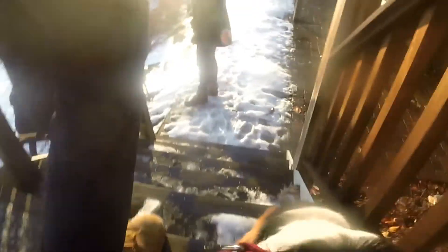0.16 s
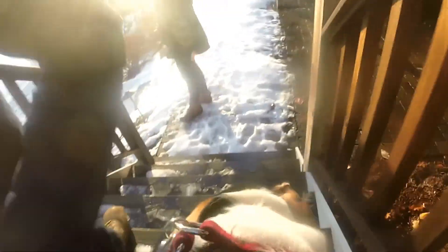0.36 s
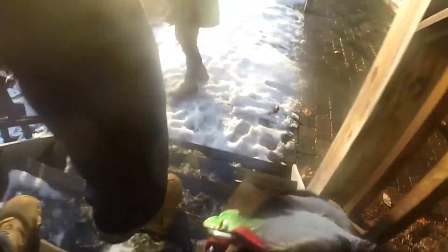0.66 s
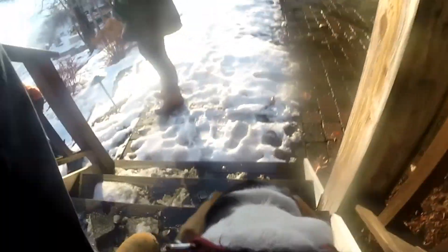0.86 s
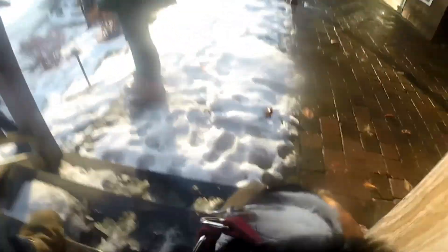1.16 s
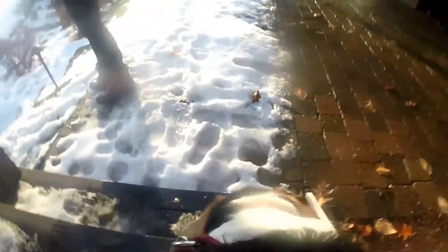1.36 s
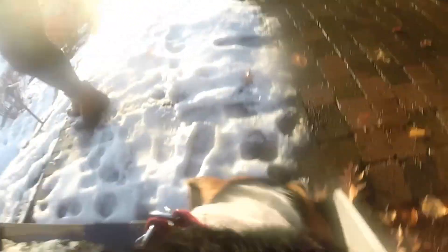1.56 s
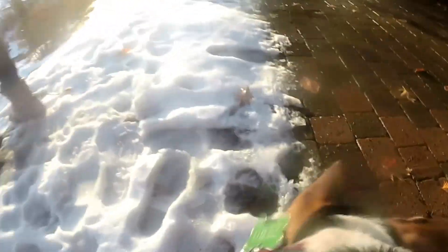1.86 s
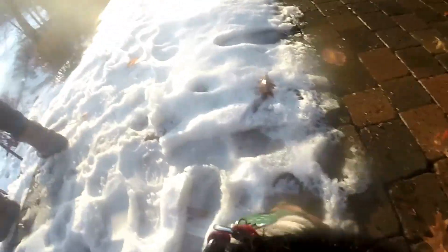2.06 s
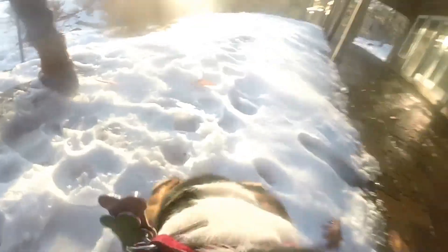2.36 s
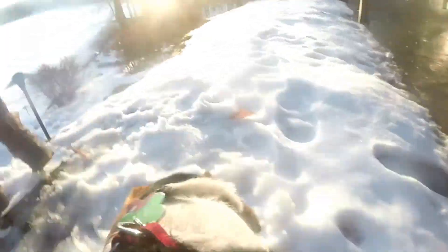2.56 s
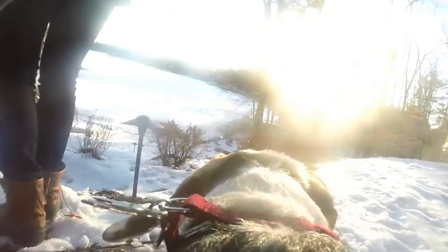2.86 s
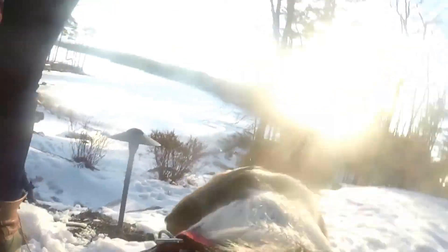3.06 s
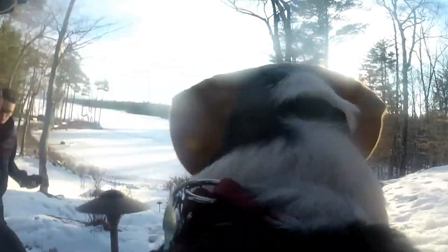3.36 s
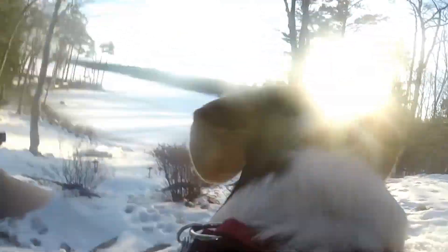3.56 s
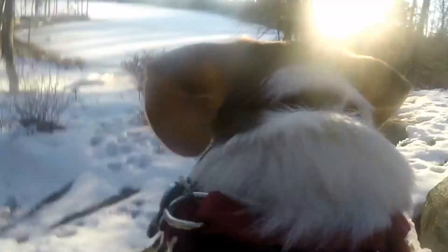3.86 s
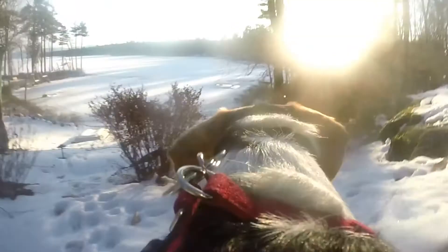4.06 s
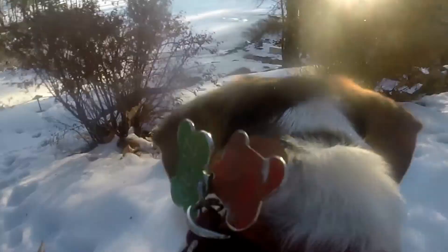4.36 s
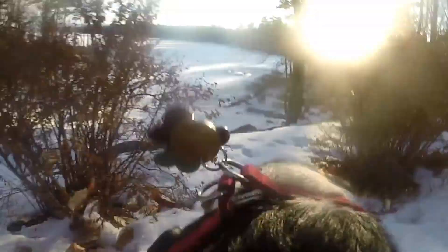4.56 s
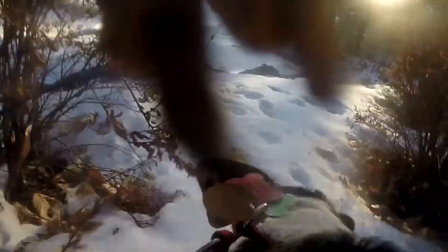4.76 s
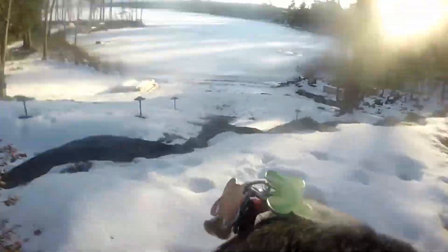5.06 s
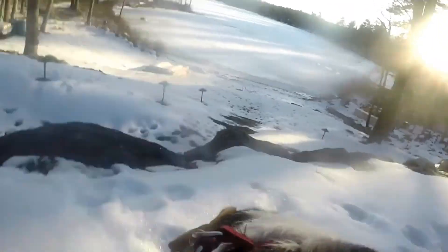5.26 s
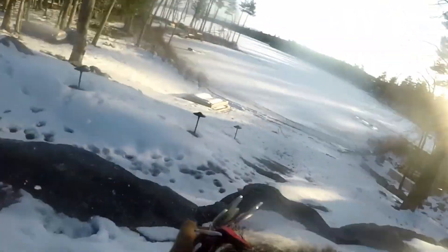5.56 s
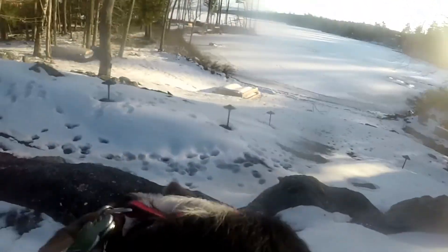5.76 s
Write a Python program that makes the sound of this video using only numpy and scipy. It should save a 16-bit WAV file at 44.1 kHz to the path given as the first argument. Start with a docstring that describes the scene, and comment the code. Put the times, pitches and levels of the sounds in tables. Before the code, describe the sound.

A dog trots out into snow, tags clinking in quick rattles over thumping strides, rubbing straps and two harsh crackling knocks.

```python
"""Collar tags and rings clink on a dog that trots down wooden steps into snow; metal modes ring at each contact.
A camera in a closed plastic case rides on its back: strides jolt the mount with a deep thump, paws knock wood.
Straps rub and tick on the case, which rings near 1.7 kHz; rumble, fur and wind noise swell with the gait.
Twice something scrapes hard over the case in bursts of stick-slip contacts, with sharp catches.
Loud bright sound makes the gain control duck."""
import sys
import numpy as np
from scipy import signal
from scipy.fft import rfft, irfft
from scipy.io import wavfile
from scipy.ndimage import uniform_filter1d

SR = 44100
rng = np.random.default_rng(int(sys.argv[2]) if len(sys.argv) > 2 else 0)


def to_wav(s):
    """Save 16-bit WAV."""
    ch = np.atleast_2d(s).T  # columns
    pcm = np.round(np.clip(ch, -1, 1) * 32767)  # PCM
    wavfile.write(sys.argv[1], SR, pcm.astype(np.int16))


def how_loud(loudness_db):
    """Turn decibels into a plain amplitude multiplier (0 dB gives 1, 20 dB gives 10)."""
    steps = np.asarray(loudness_db, float) / 20
    return 10 ** steps


N = 260190  # length in samples


def in_time(rows):
    """Turn the columns of a table into curves over all samples; the first column is time in seconds."""
    s, *columns = np.transpose(rows)
    return [np.interp(np.arange(N) / SR, s, c) for c in columns]


def rms_one(x):
    """Scale to unit rms."""
    return x / np.sqrt(np.mean(x ** 2) + 1e-20)


def filtered(x, hz, kind):
    """Gentle filter: keep what lies below (low), above (high) or between (band) the given Hz."""
    return signal.sosfilt(signal.butter(2, hz, kind, fs=SR, output="sos"), x)


def coloured(x, spectrum):
    """Shape a steady signal by a spectrum of (Hz, dB) points; rms 1."""
    hz, level_db = np.transpose(spectrum)
    grid = np.arange(N // 2 + 1) * SR / N + 1
    gain = how_loud(np.interp(np.log(grid), np.log(hz), level_db))
    return rms_one(irfft(rfft(x) * gain, N))


def grains(per_s, spread_db):
    """Random contacts of uneven size and sign; rms 1."""
    sizes = how_loud(spread_db * np.minimum(rng.exponential(1, N), 5))
    signs = rng.choice([-1, 1], N)
    happens = rng.random(N) < per_s / SR
    return rms_one(sizes * signs * happens)


def clumps(per_s, depth_db):
    """A wandering random gain: contacts come in bunches with quieter moments between."""
    knots = np.arange(0, N + SR / per_s, SR / per_s)
    return how_loud(depth_db * np.interp(np.arange(N), knots, rng.standard_normal(len(knots))))


def ring(clicks, hz, t60):
    """A unit click sets a sine of height 1 ringing; it falls by 60 dB in t60 seconds."""
    r, w = how_loud(-60 / (t60 * SR)), 2 * np.pi * hz / SR
    return signal.lfilter([0, np.sin(w)], [1, -2 * r * np.cos(w), r * r], clicks + 1e-18)


def add(out, s, piece):
    """Lay a piece into the track from time s."""
    i = max(round(s * SR), 0)
    out[..., i:i + piece.shape[-1]] += piece[..., :N - i]


def touches():
    """Sudden light touches at random moments, each reaching the three mode groups unevenly."""
    per_s, fade_s, spread_db = 45, 0.0058, 4
    happens = rng.random(N) < per_s / SR
    marks = happens * how_loud(spread_db * rng.standard_normal((3, N)))
    return signal.lfilter([1], [1, -np.exp(-1 / (fade_s * SR))], marks + 1e-18)


# Tags striking each other. Each row: start in seconds, relative level of the low modes in dB,
# brightness (middle over low modes) in dB, rattle length in ms.
CLINKS = [(0.2393, -46, 3, 15), (0.2927, -53.5, 7.5, 8.5), (0.415, -47.5, 2.5, 64), (0.4837, -46, 2, 44),
          (0.535, -45, 0.5, 48), (0.563, -29.5, -3, 6.6), (0.6391, -34.5, -19, 9.5), (0.774, -54, -1, 14),
          (0.8558, -45, 8.5, 11), (0.9986, -52, 3, 12), (1.0683, -45.5, 4, 47), (1.113, -40.5, -2, 23),
          (1.1657, -51, 3, 29), (1.2152, -33.5, -18, 6), (1.2705, -43.5, -18, 6.9),
          (1.3623, -44.5, 0.5, 30), (1.4115, -37.5, -0.5, 3.7), (1.4607, -58, 0.1, 8.1),
          (1.5786, -52.5, 3, 18), (1.62, -47.5, 2, 9.7), (1.6432, -38.5, -0.5, 52), (1.723, -43, -4, 21),
          (1.8198, -38.5, -21, 6.5), (1.913, -45, -4, 18), (1.964, -41, -6, 11), (1.992, -38, -9, 12),
          (2.004, -33.5, -7.5, 39.5), (2.1577, -38, -6.5, 5.9), (2.2228, -54, 7, 16),
          (2.2431, -45.5, -2, 31), (2.284, -39, -16, 10), (2.3088, -41.5, -26, 9), (2.3685, -49.5, 5, 28),
          (2.3993, -37.5, -3, 34), (2.4364, -25.5, -3, 7.9), (2.478, -48, 13, 13.5),
          (2.4926, -43.5, -25, 25), (2.5304, -36.5, -2.5, 19), (2.543, -31.5, -8, 20),
          (2.6402, -43.5, -1, 45), (3.0593, -52.5, 15, 5.9), (3.0767, -39, 2.5, 17), (3.1, -41, -4.5, 35),
          (3.2878, -40.5, 4, 8.5), (3.3138, -38, 2, 16), (3.343, -35.5, 4, 9.6), (3.3973, -41.5, -9, 8.4),
          (3.4744, -40.5, 2.5, 30), (3.618, -51.5, 17.5, 4.9), (3.824, -52, -1, 22), (3.849, -43, -4, 21),
          (3.8694, -44.5, 4.5, 22), (3.941, -46.5, 0, 8.5), (3.9632, -44.5, 9, 11), (3.9756, -42, 5, 55),
          (4.055, -46.5, 4, 26), (4.196, -44.5, 3, 62), (4.279, -29, 0.5, 18), (4.2993, -20.5, -2, 30.3),
          (4.3678, -46, 10, 31), (4.4282, -41, -1, 14), (4.4746, -37, -17, 14), (4.488, -41.5, 5, 8.6),
          (4.5105, -19.5, -14, 12.7), (4.5674, -46, -3, 8.3), (4.6596, -32.5, 8, 14), (4.682, -32, 2, 48),
          (4.7908, -29.5, 12.5, 21), (4.9923, -46, -16, 9.9), (5.0157, -36.5, -8, 15),
          (5.0711, -37, -1, 24), (5.114, -45.5, -6, 20), (5.137, -42, -26, 9.7), (5.1923, -48.5, -5, 23),
          (5.249, -46, -5, 12), (5.2678, -35.5, -3.5, 11), (5.33, -34.5, -8, 45), (5.357, -27.5, 1.5, 8.5),
          (5.457, -41, -1.5, 3.7), (5.4856, -50, -1, 12), (5.5544, -56, 7, 25), (5.601, -34, -1, 3.4),
          (5.765, -48.5, 8.5, 4.1), (5.8449, -44, -4.5, 26)]
# Tones at which tags and rings sound. Each row: pitch in Hz, relative level in dB,
# time to fall 60 dB in seconds.
TAG_MODES = [(3520, -18, .08), (4050, -12, .055), (4780, -3, .045), (5300, -13, .025), (5990, 0, .04),
             (6150, -6, .035), (6900, -8, .025), (7500, -10, .025), (8280, -5, .04), (9340, -3, .035),
             (9740, -6, .04), (10250, -9, .03), (10800, -7, .06), (12700, -1, .04), (13300, -6, .045),
             (13550, -3, .05), (14400, -9, .05), (14900, -11, .045)]
# Where the low, middle and high groups of modes meet: two frequencies in Hz.
MODE_GROUP_EDGES_HZ = [7300, 11800]


def tags(loose_db):
    """Each clink is a short dense rattle; how well a contact reaches a mode changes as the tags turn."""
    high_modes_db, high_follows = -7.0, 0.69  # high over low modes, share of the brightness they follow
    after_db, after_s = -14.5, 0.037  # the tags keep touching after a clink: relative level, fading time
    t = np.arange(round(.16 * SR)) / SR
    shaking, swinging = np.zeros((3, N)), how_loud(loose_db) * np.ones((3, 1))
    for s, low_db, bright_db, rattle_ms in CLINKS:
        group_db = low_db + np.array([0, bright_db, high_modes_db + high_follows * bright_db])
        rattle = np.exp(-(t * 1000 / max(rattle_ms, 1)) ** 3)
        first_hit = 1.9 * np.exp(-t / 0.0013)
        onset = 1 - np.exp(-t / 0.00022)
        add(shaking, s, how_loud(group_db)[:, None] * (rattle + first_hit) * onset)
        add(swinging, s, how_loud(group_db + after_db)[:, None] * np.exp(-t / after_s))
    shaking = shaking + swinging * touches()
    force = how_loud(-25.0) * shaking * grains(4000, spread_db=4.5)
    # hard clashes press the tags together and choke their ringing
    ringing = force / (1 + shaking / how_loud(-37.0)) ** 0.37
    out, turns = np.zeros(N), np.arange(0, N + 600, 600)
    for hz, level_db, t60 in TAG_MODES:
        facing_db = np.interp(np.arange(N), turns, rng.normal(0, 5.8, len(turns)))
        group = np.searchsorted(MODE_GROUP_EDGES_HZ, hz)
        contacts = ringing[group] * rng.standard_normal(N)
        out += ring(contacts * how_loud(level_db + facing_db - 4.0), hz, t60)
    # the contacts themselves: a bright crackle in each range
    for group, band_hz in enumerate([(3600, 6150), (7300, 9970), (11800, 22000)]):
        crackle = force[group] * clumps(120, depth_db=1.0)
        out += how_loud(19.5) * filtered(crackle, band_hz, "band")
    return out


# Resonances of the plastic case. Each row: pitch in Hz, width in Hz, relative level in dB.
CASE = [(1248, 750, -8), (1669, 240, 4.5), (2252, 333, -1), (2642, 387, -2.5), (3210, 880, -10.5),
        (4400, 1800, -15)]


def case(x):
    """Parallel resonances of the plastic case, with the bass taken away."""
    out = 0
    for k, (hz, width_hz, level_db) in enumerate(CASE):
        r = np.exp(-np.pi * width_hz / SR)
        poles = [1, -2 * r * np.cos(2 * np.pi * hz / SR), r * r]
        resonance = signal.lfilter([(1 - r * r) / 2, 0, -(1 - r * r) / 2], poles, x)
        out = out + (-1) ** k * how_loud(level_db) * resonance
    return filtered(out, 800, "high")


# Straps dragging harder for a moment. Each row: centre in seconds, relative peak level in dB,
# length in seconds (two standard deviations of the swell).
DRAGS = [(0.152, -55, 0.053), (0.527, -52, .04), (0.716, -53.5, 0.052), (1.092, -39, 0.028),
         (1.286, -41, .06), (1.379, -42, .015), (1.659, -33.5, 0.022), (1.892, -47.5, 0.16),
         (2.24, -50.5, 0.21), (4.746, -49, .06), (5.06, -45.5, .05), (5.526, -54, 0.068),
         (5.774, -57, 0.055)]


def straps(rub_db):
    """Fine contacts ring the case all the time and swell at each drag."""
    t = np.arange(N) / SR
    swells = sum(how_loud(peak_db) * np.exp(-2 * ((t - s) / length) ** 2) for s, peak_db, length in DRAGS)
    force = how_loud(rub_db) + swells
    return force * clumps(40, depth_db=2.5) * rms_one(case(grains(2000, spread_db=0.0)))


# Straps on the case and small hardware shaking loosely. Each row: time in seconds,
# relative strap rub in dB, relative loose jingle in dB.
HARNESS = [(0.0, -54.5, -69), (0.4, -52.5, -66), (1.0, -50, -55), (1.4, -55, -78), (1.75, -46.5, -60),
           (2.01, -67.5, -54), (2.45, -54.5, -56), (2.87, -50.5, -57), (3.47, -52, -59), (3.6, -52.5, -59),
           (3.97, -50.5, -61), (4.3, -50, -45), (4.6, -46.5, -60), (4.8, -53.5, -53), (5.02, -55, -41),
           (5.2, -54, -60), (5.6, -55.5, -55), (5.9, -60.5, -70)]


def harness():
    """The strap rub and the loose jingle each follow their own level curve, under the clinks and drags."""
    rub_db, loose_db = in_time(HARNESS)
    return tags(loose_db) + straps(rub_db)


# Tone colour of fur and wind. Each row: frequency in Hz, relative level in dB.
FUR = [(70, -7.5), (130, -2), (250, -6.5), (450, -12.5), (800, -18), (1100, -27.5), (3000, -48.5)]


def fur_noise():
    """Soft noise of fur and wind: random noise with most of its treble removed; rms 1."""
    return coloured(rng.standard_normal(N), FUR)


# Tone colour of the rumble. Each row: frequency in Hz, relative level in dB.
RUMBLE = [(12, 2.5), (22, 3.5), (45, -2), (90, -14), (160, -30), (300, -45), (600, -77)]
# How the gait swells. Each row: time in seconds, rumble in dB, fur and wind in dB.
GAIT = [(0.0, -30.5, -52.5), (0.24, -23, -49.5), (0.4, -32, -55), (0.5, -24, -50.5), (0.94, -27.5, -53.5),
        (1.11, -18.5, -41), (1.2, -31.5, -54), (1.4, -22, -46.5), (1.53, -38, -58), (1.62, -22.5, -41.5),
        (1.99, -23.5, -52.5), (2.13, -30, -53.5), (2.86, -24.5, -49), (3.05, -31, -54.5),
        (3.42, -20.5, -50), (3.6, -27, -50.5), (4.04, -19, -50), (4.48, -21, -46.5), (4.78, -17.5, -43.5),
        (4.98, -31, -48.5), (5.11, -21, -43), (5.19, -27, -60), (5.28, -17.5, -43), (5.9, -35, -60)]


def gait():
    """Low rumble, and fur and wind noise, each following its own level curve as the dog moves."""
    rumble_db, fur_db = in_time(GAIT)
    rumble = how_loud(rumble_db) * coloured(rng.standard_normal(N), RUMBLE)
    return rumble + how_loud(fur_db) * fur_noise()


# Tone colour of the air. Each row: frequency in Hz, relative level in dB.
AIR = [(100, 14), (300, 4), (900, 2.5), (1700, 3), (3400, -11.5), (6200, -10.5), (7500, -13.5), (8500, -50),
       (16000, -57)]


def air():
    """Faint constant noise whose level wavers a little."""
    return how_loud(-55) * clumps(7.1, depth_db=0.5) * coloured(rng.standard_normal(N), AIR)


# Strides shaking the mount. Each row: centre in seconds, relative peak level in dB,
# width at half height in ms.
JOLTS = [(0.221, -10.5, 11.8), (0.552, -14, 13), (0.812, -7.5, 12.7), (1.1, -14, 13), (1.307, -13, 16.8),
         (1.379, -8.5, 12.4), (1.586, -13.5, 4.5), (1.935, -10, 12.1), (1.986, -10, 7.1),
         (2.338, -12, 13.4), (2.402, -10, 8.7), (2.695, -14.5, 10), (2.802, -12.5, 6.5), (2.925, -4, 3.53),
         (2.989, -9, 4.7), (3.416, -4, 10.4), (3.586, -12, 6.7), (3.999, -5.5, 11.5), (4.082, -13.5, 5.3),
         (4.155, -14, 9.3), (4.203, -6, 9.1), (4.255, -7, 7.4), (4.343, -18.5, 14), (4.479, -1, 5.24),
         (4.548, -13.5, 11.6), (4.667, -3, 5.3), (4.781, 0.4, 7.8), (4.833, -14, 5.4), (5.289, -7.5, 6.4),
         (5.504, -13, 8.4)]


def jolts():
    """The mount swings out and back: one main lobe between two weaker ones, with a puff of fur noise."""
    out, puffs = np.zeros(N), np.zeros(N)
    sides = rng.choice([-1, 1], len(JOLTS))
    for (s, peak_db, width_ms), side in zip(JOLTS, sides):
        u = np.arange(-.06, .06, 1 / SR) * 1250 / width_ms
        swing = (1 - u ** 2) * np.exp(-u ** 2 / 2)
        add(out, s - .06, side * how_loud(peak_db - 0.5) * swing)
        add(puffs, s - .06, how_loud(peak_db - 29.0) * np.exp(-u ** 2 / 6))
    return out + puffs * fur_noise()


# Paws landing on a wooden step. Each row: start in seconds, level of the blow in dB, lower pitch in Hz.
STEPS = [(0.437, -16.5, 131), (1.577, -18.5, 136)]


def steps():
    """A soft blow on a plank: two short low modes."""
    out = np.zeros(N)
    for s, peak_db, hz in STEPS:
        blow = np.zeros(N)
        add(blow, s, how_loud(peak_db) * np.hanning(130) / 65)
        out += ring(blow, hz, 0.051) + how_loud(-1.5) * ring(blow, 1.68 * hz, 0.033)
    return out


# Ticks and sharp scrape catches on the case. Each row: start in seconds, relative level in dB,
# time for the rattle to fall 60 dB in ms.
TICKS = [(0.725, -29.5, 86), (0.7542, -20, 18), (0.9058, -25, 24), (1.076, -31, 37), (1.3628, -14.5, 14),
         (1.467, -28.5, 31), (1.647, -30, 110), (1.8213, -36, 30), (1.935, -15.5, 15.5),
         (2.2269, -25.5, 21), (2.8805, -22, 23), (2.905, -10.5, 62), (2.9251, 1.5, 13), (2.9644, -11, 59),
         (2.9847, -0.5, 23), (3.0088, -12, 23), (3.2195, -36, 30), (3.406, -31, 35), (4.8968, -20.5, 28),
         (4.9209, -9.5, 11), (4.9265, -3.5, 19), (4.93, -12, 60), (4.948, -13, 64), (5.025, -24, 25),
         (5.0503, -20, 45)]


def ticks():
    """A sharp blow and a dying rattle, heard through the case and as a dull knock through the mount."""
    force, t = np.zeros(N), np.arange(round(.06 * SR)) / SR
    noises = rng.standard_normal((len(TICKS), len(t)))
    for (s, peak_db, t60_ms), noise in zip(TICKS, noises):
        blow = 0.35 * noise * how_loud(-60000 * t / max(t60_ms, 1))
        blow[:3] += 1
        add(force, s, how_loud(peak_db + 13.5) * blow)
    knock = filtered(force, [450, 1300], "band")
    return filtered(case(force), 6000, "low") + how_loud(-14) * knock


# Tone colour of the scrape's hiss. Each row: frequency in Hz, relative level in dB.
HISS = [(1200, -39), (2400, 12.5), (3000, 2), (4000, -0.5), (6200, 7.5), (8000, 0), (11000, -7),
        (15000, -10), (17000, -34)]
# Tone colour of the scrape's thud. Each row: frequency in Hz, relative level in dB.
THUD = [(100, -1), (200, 4), (500, -6.5), (900, -3), (1300, -30), (4000, -62)]
# Hard scrapes over the case. Each row: a trio of relative levels (case ring in dB, hiss in dB, thud in dB),
# then the course of the scrape, whose rows hold time in seconds, pressure in dB, extra hiss in dB.
SCRAPES = [((-1.1, -8.5, -8), [(2.874, -67, -9), (2.882, -25.5, -4), (2.9, -27.5, -0.5), (2.926, -10.5, 1),
           (2.94, -9.5, -4), (2.957, -20.5, -6), (2.985, -17, -0.5), (2.995, -37, 18), (3.011, -30, 4),
           (3.018, -66, 7)]), ((-18, 0.077, -29), [(4.876, -73, 0.1), (4.883, -33.5, 4.8),
           (4.904, -7, -25.5), (4.912, -21, -31), (4.919, -14, -14), (4.926, -10, 1.8), (4.949, -10.5, 0.7),
           (4.954, -26, 3), (4.96, -18.5, 2), (4.97, -40, -8)])]


def scrapes():
    """Dense stick-slip contacts, in bunches, ring the case, hiss past it and thud through the mount."""
    slips = grains(6000, spread_db=2.5) * clumps(250, depth_db=5.0)
    body, hiss, thud = rms_one(case(slips)), coloured(slips, HISS), coloured(slips, THUD)
    out, t = 0, np.arange(N) / SR
    for (case_db, hiss_db, thud_db), rows in SCRAPES:
        pressure_db, bright_db = in_time(rows)
        touching = (t > rows[0][0]) & (t < rows[-1][0])
        mix = how_loud(case_db) * body + how_loud(hiss_db + bright_db) * hiss + how_loud(thud_db) * thud
        out = out + touching * how_loud(pressure_db) * mix
    return out


def scene():
    """All sources reach one microphone inside the case."""
    return (harness() + gait() + air() + jolts() + steps() + ticks() + scrapes())[None]


def gain_control(x, knee_db, share, held_fall_db_per_s):
    """Loud bright sound turns the gain down within milliseconds; it creeps back afterwards."""
    bright = filtered(x, 1000, "high")
    level_db = 10 * np.log10(uniform_filter1d(bright ** 2, size=441) + 1e-12)
    # hold each peak, letting the held level sink at a steady rate
    ramp = held_fall_db_per_s * np.arange(N) / SR
    held_db = np.maximum.accumulate(level_db + ramp, axis=-1) - ramp
    cut_db = share * np.maximum(held_db - knee_db, 0)
    smooth_cut_db = signal.lfilter([.004], [1, -.996], cut_db)
    return x * how_loud(-smooth_cut_db)


def top_cut(x):
    """Nothing passes above the cut-off."""
    return signal.sosfilt(signal.butter(12, 16340, fs=SR, output="sos"), x)


def record(dry):
    """Gain control, rounded peaks and a treble cut."""
    level = gain_control(dry, knee_db=-25.5, share=0.28, held_fall_db_per_s=164)
    rounded = level / (1 + np.abs(level / .97) ** 4) ** .25
    finished = signal.sosfilt(signal.cheby2(10, 60, 16200, fs=SR, output="sos"), rounded)
    return top_cut(finished)


dry = scene()
out = record(dry)
to_wav(out)
```